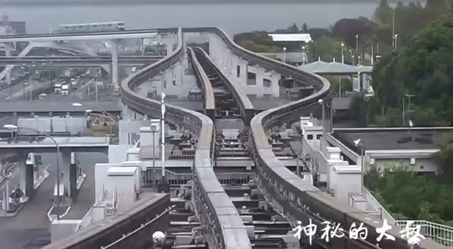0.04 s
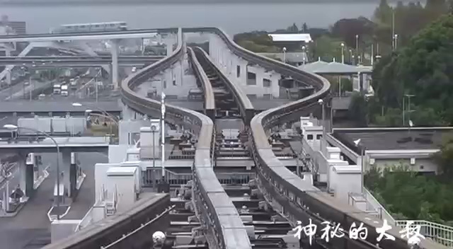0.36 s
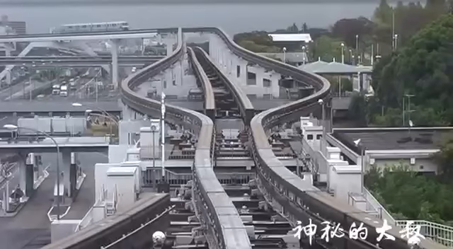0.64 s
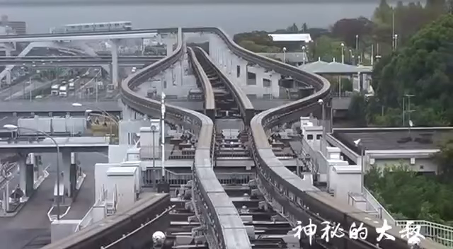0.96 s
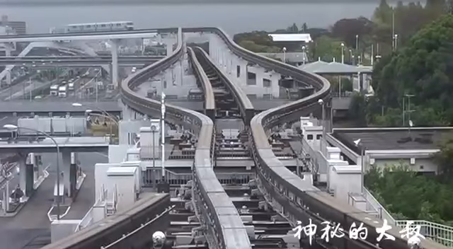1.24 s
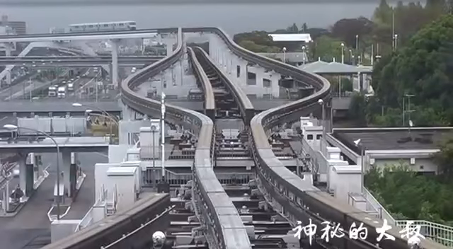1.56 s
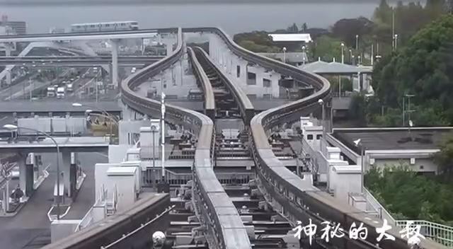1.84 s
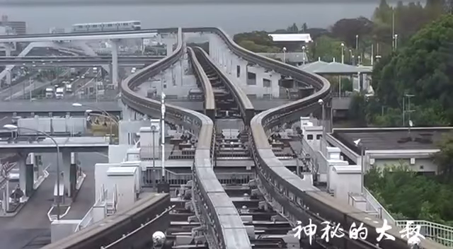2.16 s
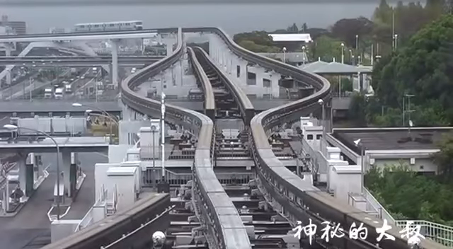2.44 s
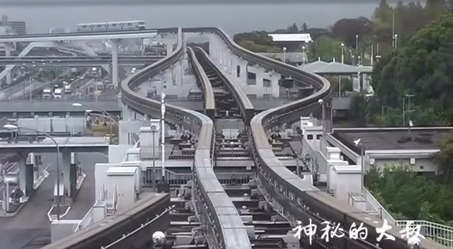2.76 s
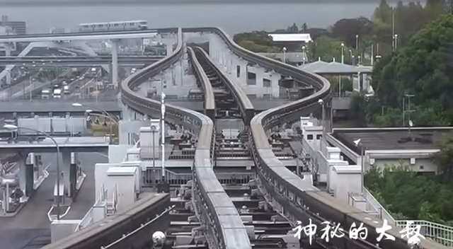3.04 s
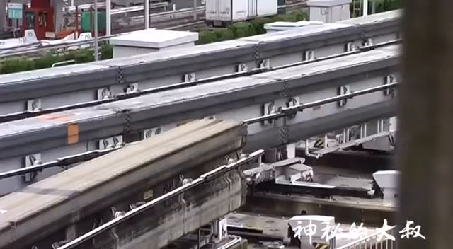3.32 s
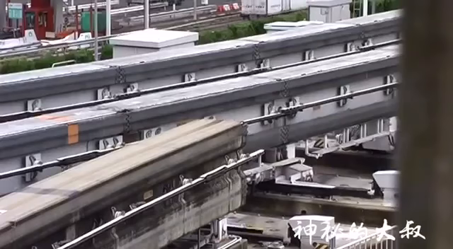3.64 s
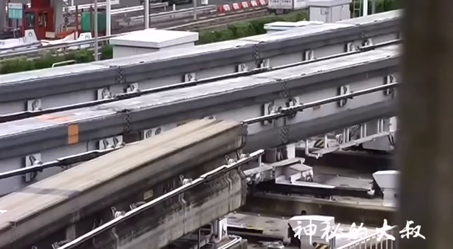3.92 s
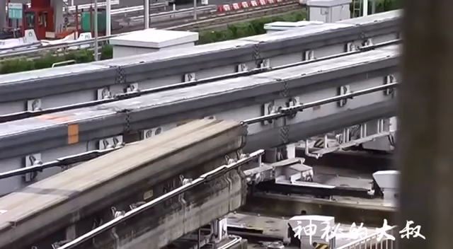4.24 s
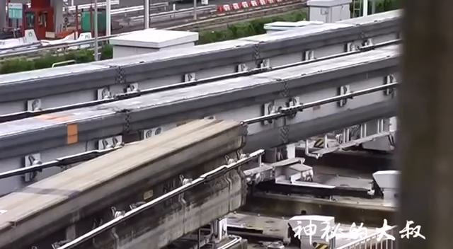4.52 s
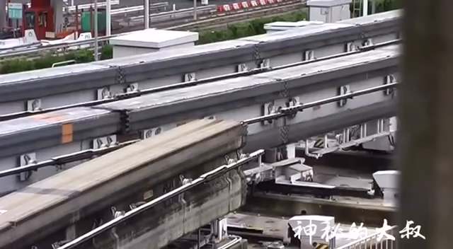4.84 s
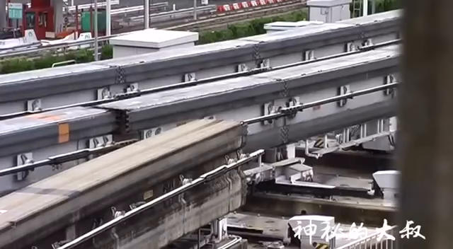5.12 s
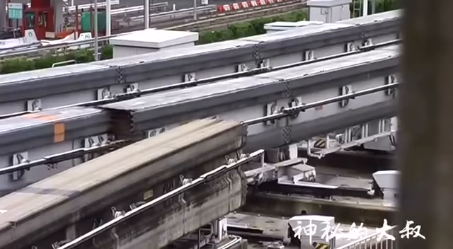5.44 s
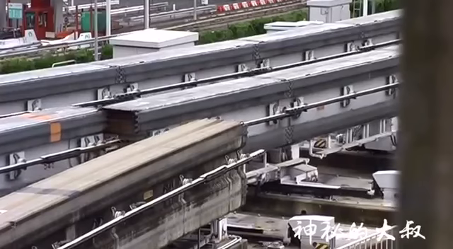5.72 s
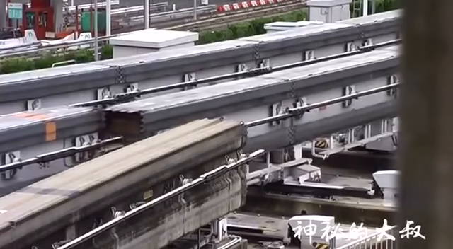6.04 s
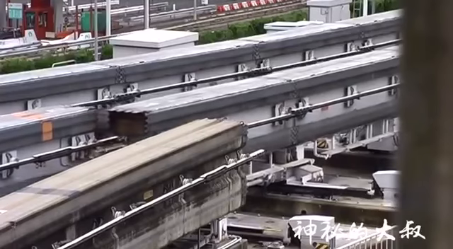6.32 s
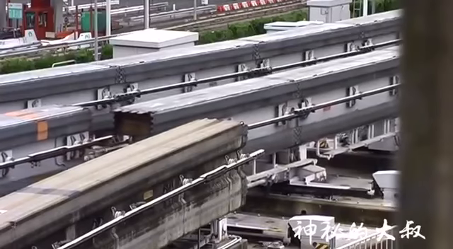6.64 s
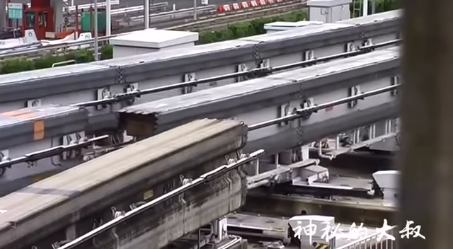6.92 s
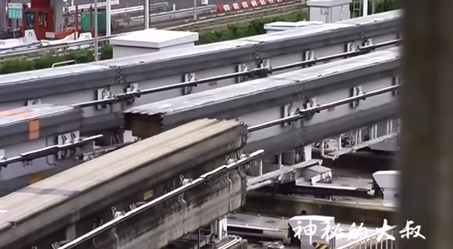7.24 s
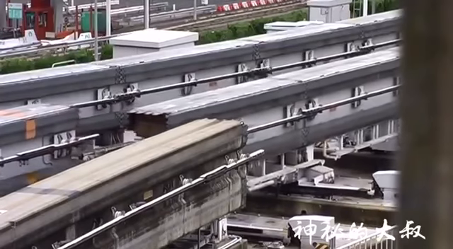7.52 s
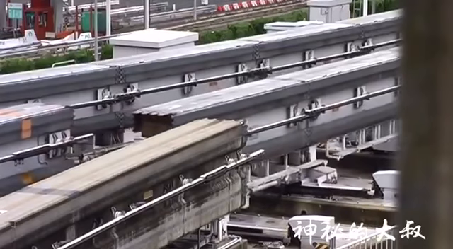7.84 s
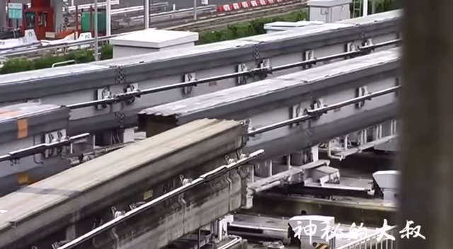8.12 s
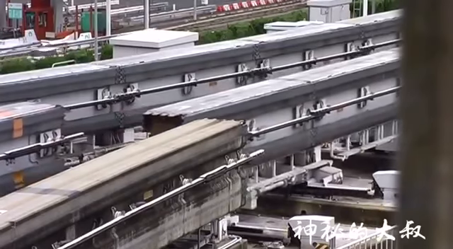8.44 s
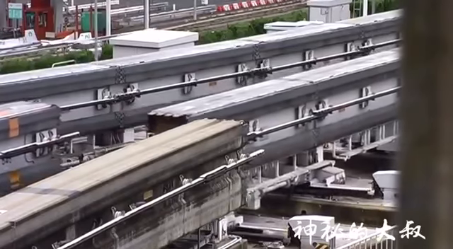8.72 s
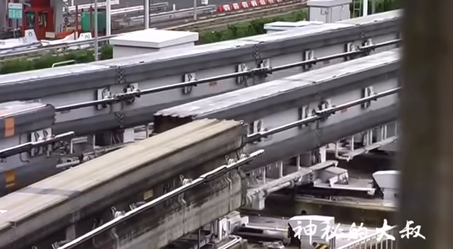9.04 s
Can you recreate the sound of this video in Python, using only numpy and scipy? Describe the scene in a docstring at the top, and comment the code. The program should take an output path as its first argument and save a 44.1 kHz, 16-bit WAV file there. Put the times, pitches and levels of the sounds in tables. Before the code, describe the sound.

A machine drones over city traffic, then a motor shifts a heavy track beam with metallic clanks, scrapes and dull knocks outdoors.

```python
"""Monorail track switch, outdoors

One mono microphone, two positions in turn. At the first, a machine drones over the wash of city traffic.
At the second, beside the switch, a motor slides a heavy hollow beam across: its steel joint scrapes
and clanks, the beam knocks and groans, and the blows echo in the yard. Far vehicles swell and fade."""
import sys
import numpy as np
from scipy import signal
from scipy.fft import rfft, irfft, next_fast_len
from scipy.io import wavfile
from scipy.ndimage import uniform_filter1d, map_coordinates

SR = 44100
rng = np.random.default_rng(int(sys.argv[2]) if len(sys.argv) > 2 else 0)


def file_out(sig):
    """Save sig as 16-bit WAV at sys.argv[1]."""
    # one column per channel
    cols = np.atleast_2d(sig).T
    # limit, then scale
    lim = np.clip(cols, -1, 1)
    pcm = np.round(lim * 32767).astype(np.int16)
    wavfile.write(sys.argv[1], SR, pcm)


N = 399987

START_S, CUT_S = 0.085, 3.115  # the first position opens, then cuts to the second
TOP_HZ = 9900
GEAR_HZ, MOTOR_HUM_HZ = 260.8, 118.4
GROAN_HZ, GROAN_DB = 317, -36.5
GROAN_FROM_S, GROAN_TO_S, GROAN_FADE_S = 3.4, 6.33, 0.63
RUMBLE_DB, TYRE_DB, HISS_DB, CITY_DB = -29, -31.5, -43, -28  # steady beds of far traffic

# Beside the switch, steel hitting steel:
# (time [s], level [dB], favoured pitch [Hz], focus [dB/octave], ring length [share of t60])
JOINT_HITS = [(3.679, -30, 5660, 50, .35), (3.757, -29, 5150, 31, 0.63), (3.845, -31, 3600, 10, 0.23),
              (4.219, -21, 2500, 13, .2), (4.270, -33, 3000, 10, .3), (4.415, -33, 5000, 14, .3),
              (4.711, -26, 5800, 13, 0.24), (4.7365, -11.5, 2000, 14, 0.08), (4.757, -29, 3030, 37, 0.5),
              (5.160, -27, 3800, 12, .4), (5.190, -25, 3500, 7, 0.38), (5.205, -26.5, 3456, 60, 0.84),
              (5.384, -24.5, 3700, 7, 0.4), (5.398, -27.5, 3456, 60, 0.5), (5.607, -18.5, 4400, 32, 0.35),
              (5.630, -31, 5500, 12, 0.36), (5.686, -23.5, 3000, 6, 0.3)]
# modes of the steel joint: (frequency [Hz], level [dB], t60 [s])
JOINT_MODES = [(1868, -2, .3), (2116, -3, .3), (2650, -7, .3), (3105, -1, .45), (3273, -4, .3),
               (3456, -2, 1.0), (3800, -4, .25), (4410, -3, .2), (5080, -2, .22), (5750, -4, .2),
               (6170, 0, .3), (7020, -2, .35), (8193, -5, .6), (8720, -8, .3)]
# sliding strokes of the joint: (time [s], level [dB], rise [s], t60 [s], squeal [share of power])
JOINT_STROKES = [(3.70, -35.5, 0.068, 0.55, 0.14), (4.21, -27, 0.061, 0.89, 0.01),
                 (4.441, -36, .03, 0.44, 0.1), (4.54, -35, .02, .35, .05), (4.66, -36, 0.066, 0.98, 0.56),
                 (4.98, -32, 0.07, .7, 0.26), (5.15, -27.5, 0.041, 0.86, 0),
                 (5.375, -31.5, .04, 0.85, 0.03), (5.60, -28.5, 0.016, 0.64, 0.06),
                 (5.81, -37.5, 0.077, .7, 1), (6.11, -40.5, .04, .55, 1), (8.29, -37, 0.022, 0.34, .2)]
# steel grinding and steel squealing: (frequency [Hz], relative level [dB])
GRIND_SPECTRUM = [(300, -15), (1000, 2), (1900, 0.5), (3000, -2), (4000, -5.5), (6000, -10.5), (7500, -17),
                  (9400, -17.5), (10000, -32)]
SQUEAL_SPECTRUM = [(1500, -31), (2850, -11), (3100, 5), (3450, -13), (5000, -13), (6050, -3.5), (7000, -13),
                   (8300, -14), (10000, -27)]
# knocks of the hollow beam: (time [s], level [dB], pitch [Hz], t60 [s])
BEAM_KNOCKS = [(4.7352, -19, 307, 0.23), (4.754, -18.5, 640, 0.074), (5.745, -20, 341, 0.27),
               (7.475, -16.5, 492, 0.15)]
# the gear note as the load on the motor changes: (time [s], level [dB])
GEAR_LEVEL = [(3.1, -51), (5.6, -42.5), (6.3, -37.5), (7.0, -35), (7.18, -31), (7.7, -30), (7.9, -37),
              (9.05, -39)]
# decay of the yard around the microphone: (frequency [Hz], t60 [s])
YARD_DECAY = [(200, 0.89), (2000, 0.22), (10000, 0.18)]
# vehicles passing far from the switch:
# (time when nearest [s], engine [dB], tyre roar [dB], tyre hiss [dB], half-width [s])
VEHICLES = [(4.4, -32.5, -33, -50, 0.2), (5.62, -38, -26, -39.5, 0.48), (7.22, -24.5, -26, -40, 0.53),
            (8.4, -41, -26, -42.5, 0.15), (8.92, -25.5, -28, -39.5, 0.31)]
# road rumble, engines, tyre roar and tyre hiss at a distance: (frequency [Hz], relative level [dB])
RUMBLE_SPECTRUM = [(25, -39.5), (55, -23), (90, -15.5), (120, -10), (165, -10), (220, -3.5), (290, -1),
                   (420, -4), (560, -1.5), (750, -4.5), (1200, -18.5), (3000, -59.5)]
ENGINE_SPECTRUM = [(50, -33), (120, -12), (180, -13), (260, -3.5), (380, 0.5), (520, 0.5), (700, -4.5),
                   (1200, -17), (3000, -59)]
TYRE_ROAR_SPECTRUM = [(200, -30), (500, -15.5), (780, -1.5), (1100, -0.5), (1500, -6), (2000, -10.5),
                      (2800, -17.5), (5000, -32.5), (10000, -57)]
TYRE_HISS_SPECTRUM = [(600, -34), (1600, -0.5), (2600, 1), (4000, -2), (5700, -6), (7000, -11), (8500, -14),
                      (9500, -19.5), (10000, -43)]

# First position, the machine's tones: (pitch [Hz], level [dB], level wander [dB], pitch wander [Hz])
MACHINE_TONES = [(118.7, -44, 1, 1), (158.2, -24, 1.5, 0.13), (520.3, -33.5, -0.6, 0.45)]
# far engines standing out of the wash: (time when nearest [s], level [dB], pitch [Hz], half-width [s])
FAR_ENGINES = [(0.56, -31, 294, 0.07), (0.95, -33.5, 442.6, 0.42), (1.72, -33, 295.6, 0.12),
               (2.13, -26.5, 282, 0.065), (2.62, -33.5, 275, 0.1)]
# roar and hiss of the city: (frequency [Hz], relative level [dB])
CITY_ROAR_SPECTRUM = [(25, -28), (50, -27), (80, -7.5), (120, -2.5), (220, -3), (400, 0), (900, -1),
                      (1500, -7.5), (2500, -17), (5000, -32.5), (10000, -67.5)]
CITY_HISS_SPECTRUM = [(500, -35), (1500, 2), (2600, 1.5), (4200, -1), (6400, -3), (8000, -9.5),
                      (9500, -16.5), (10000, -52)]
# slow swell of the city's hiss: (time [s], level [dB])
CITY_HISS_LEVEL = [(0.1, -38.5), (0.65, -35), (3.1, -36)]


def clanks():
    """Each contact cracks and rings the steel joint; where it lands decides which modes speak."""
    out, t = np.zeros(N), np.arange(SR) / SR
    hz, mode_db, t60 = np.transpose(JOINT_MODES)[:, :, None]
    air = lambda f: 1 / (1 + (f / 8000) ** 6)  # distance to the microphone dulls the crack
    attack = 1 - np.exp(-t / 0.00031)
    for s, db, favoured_hz, focus_db, length in JOINT_HITS:
        favour = lambda f: amp(-focus_db * np.abs(np.log2((f + 1) / favoured_hz)))
        strength = amp(mode_db + 1.5 * rng.standard_normal(hz.shape)) * favour(hz)
        # rubbing parts blur the pitch, most of all for the short-lived modes
        blur = np.cumsum(rng.standard_normal((len(hz), SR)), axis=1) * 0.0076 / t60
        phase = 2 * np.pi * (hz * t + rng.random(hz.shape)) + blur
        ring = np.sum(strength * np.sin(phase) * amp(-60 * t / (t60 * length)), axis=0)
        noise = unit(filtered(rng.standard_normal(SR), lambda f: favour(f) * air(f)))
        crack = noise * amp(-60 * t / 0.044)
        add(out, s, amp(db) * (amp(-7) * ring + amp(-6) * crack) * attack)
    return out


def scrapes():
    """The joint's fingers slide apart in showers of tiny slips that stir its modes; some strokes squeal."""
    out, t = np.zeros(N), np.arange(SR) / SR
    for s, db, rise, t60, share in JOINT_STROKES:
        slips = rng.standard_normal(SR) * (rng.random(SR) < 6000 / SR)  # about 6000 a second
        ring = unit(filtered(slips, joint_resonance))
        grind = unit(coloured(slips, GRIND_SPECTRUM) + 0.12 * ring)
        squeal = coloured(rng.standard_normal(SR), SQUEAL_SPECTRUM)
        rub = np.sqrt(1 - share) * grind + np.sqrt(share) * squeal
        stroke = np.minimum(t / rise, 1) ** 0.39 * amp(-60 * np.maximum(t - rise, 0) / t60)
        add(out, s, amp(db) * stroke * rub)
    return out


def joint_resonance(f):
    """Response of the steel joint, damped while its parts rub."""
    return sum(amp(db) / (1 + 1j * (f - hz) * t60 / 8) for hz, db, t60 in JOINT_MODES)


def knocks():
    """The hollow beam answers with a short, dull cluster of close modes."""
    out, t = np.zeros(N), np.arange(SR) / SR
    attack = 1 - np.exp(-t / 0.0012)
    for s, db, hz, t60 in BEAM_KNOCKS:
        cluster = noise_band(SR, hz, half_width_hz=90)
        body = 1.13 * np.sin(2 * np.pi * hz * t) + 0.51 * cluster
        add(out, s, amp(db) * body * amp(-60 * t / t60) * attack)
    return out


def motor():
    """The motor drives the beam; its gear note, the octave above and its hum grow with the load."""
    gear_db = curve(GEAR_LEVEL)
    note = tone(GEAR_HZ, wander_db=2.5, wander_hz=5)
    octave = amp(-6.5) * tone(2 * GEAR_HZ, wander_db=3, wander_hz=16)
    hum = amp(-35 + 0.35 * gear_db) * tone(MOTOR_HUM_HZ, wander_db=1.5, wander_hz=5.01)
    return amp(gear_db) * (note + octave) + hum


def groan():
    """The hollow beam groans in one narrow band while its joint slides apart."""
    t = np.arange(N) / SR
    sliding = np.clip(np.minimum(t - GROAN_FROM_S, GROAN_TO_S - t) / GROAN_FADE_S, 0, 1)
    return amp(GROAN_DB) * sliding * noise_band(N, GROAN_HZ, half_width_hz=22)


def yard(x):
    """Concrete beams and walls scatter the sound back to the microphone; the treble dies first."""
    hz, t, spectra = signal.stft(rng.standard_normal(SR), SR, nperseg=256)
    decay = amp(-60 * t / along(YARD_DECAY, hz)[:, None])
    tail = signal.istft(spectra * decay, SR, nperseg=256)[1]
    return signal.fftconvolve(x, tail / np.linalg.norm(tail))[:N]


def machine():
    """Heard from the first position, a machine drones on three slightly unsteady tones."""
    return sum(amp(db) * tone(hz, wander_db, wander_hz) for hz, db, wander_db, wander_hz in MACHINE_TONES)


def traffic():
    """Far behind the switch, each vehicle adds engine noise, tyre roar and hiss to a steady bed."""
    power = lambda column: sum(passing(row[0], row[column], row[-1]) ** 2 for row in VEHICLES)
    engine_power, roar_power, hiss_power = map(power, (1, 2, 3))
    rumble = amp(RUMBLE_DB) * rush(RUMBLE_SPECTRUM, patchy_db=1.27)
    engines = np.sqrt(engine_power) * rush(ENGINE_SPECTRUM, patchy_db=2.0)
    tyres = np.sqrt(amp(TYRE_DB) ** 2 + roar_power) * rush(TYRE_ROAR_SPECTRUM, patchy_db=1.5)
    hiss = np.sqrt(amp(HISS_DB) ** 2 + hiss_power) * rush(TYRE_HISS_SPECTRUM, patchy_db=1.86)
    return rumble + engines + tyres + hiss


def city():
    """From the first position, far vehicles merge into a wash; single engines stand out for a moment."""
    wall = lambda hz: 1 + 0.13 * np.exp(-2j * np.pi * hz * 0.00682)  # a near wall ripples the spectrum
    stream = passing(s=1.55, db=-26, half_width=0.9)  # a stream of vehicles goes by
    roar = np.hypot(amp(CITY_DB), stream) * filtered(rush(CITY_ROAR_SPECTRUM, patchy_db=1.55), wall)
    hiss = amp(curve(CITY_HISS_LEVEL)) * rush(CITY_HISS_SPECTRUM, patchy_db=1.25)
    engines = sum(passing(s, db, half_width) * tone(hz, wander_db=1.5, wander_hz=0.0198 * hz)
                  for s, db, hz, half_width in FAR_ENGINES)
    return roar + hiss + engines


def passing(s, db, half_width):
    """A vehicle's gain, 1 / distance: nearest the microphone at s, 3 dB down half_width seconds away."""
    return amp(db) / np.hypot(1, (np.arange(N) / SR - s) / half_width)


def amp(db):
    """Decibels to gain."""
    return 10 ** (np.asarray(db) / 20)


def unit(x):
    """Scale to rms 1."""
    return x / np.sqrt(np.mean(x ** 2) + 1e-20)


def along(points, hz):
    """Interpolate (frequency [Hz], value) points on a log frequency axis."""
    f, values = np.transpose(points)
    return np.interp(np.log(hz + 1), np.log(f + 1), values)


def curve(points):
    """Interpolate (time [s], value) points to one value per sample."""
    return np.interp(np.arange(N) / SR, *np.transpose(points))


def wobble(rate):
    """A smooth random curve, rate knots a second."""
    knots = rng.standard_normal(int(N * rate / SR) + 4)
    return map_coordinates(knots, [np.arange(N) * rate / SR])


def filtered(x, response):
    """Pass x through a frequency response."""
    size = next_fast_len(len(x) + 8192)
    return irfft(rfft(x, size) * response(np.fft.rfftfreq(size, 1 / SR)), size)[:len(x)]


def coloured(x, spectrum):
    """x shaped by a spectrum, at rms 1."""
    return unit(filtered(x, lambda hz: amp(along(spectrum, hz))))


def noise_band(samples, hz, half_width_hz):
    """Noise of rms 1 gathered around one pitch."""
    return unit(filtered(rng.standard_normal(samples), lambda f: 1 / (1 + ((f - hz) / half_width_hz) ** 2)))


def rush(spectrum, patchy_db):
    """Coloured noise of rms 1 with drifting patches of gain."""
    spectra = signal.stft(rng.standard_normal(N), nperseg=1024)[2]
    patches = uniform_filter1d(rng.standard_normal(spectra.shape), size=7, axis=0)  # across frequency
    patches = uniform_filter1d(patches, size=10, axis=1)  # across time
    noise = signal.istft(spectra * amp(patchy_db * unit(patches)), nperseg=1024)[1][:N]
    return coloured(noise, spectrum)


def tone(hz, wander_db, wander_hz):
    """A sine of rms 1, unsteady in pitch and level."""
    phase = 2 * np.pi * np.cumsum(hz + wander_hz * wobble(12)) / SR
    return unit(np.sin(phase) * amp(wander_db * wobble(5)))


def add(track, s, sound):
    """Mix a sound into the track from time s."""
    part = track[round(s * SR):][:len(sound)]
    part += sound[:len(part)]


def scene():
    """The microphone stands at an overlook, then the scene cuts to the side of the switch."""
    t = np.arange(N) / SR
    blows = clanks() + knocks()
    switch = blows + amp(-9.5) * yard(blows) + scrapes() + motor() + groan() + traffic()
    overlook = (t > START_S) * (city() + machine())
    moved = np.clip((t - CUT_S) / 0.006 + 0.5, 0, 1)  # 6 ms crossfade
    return ((1 - moved) * overlook + moved * switch)[None]


def record(dry):
    """The recorder keeps nothing above its band limit."""
    band_limit = lambda hz: np.clip((TOP_HZ - hz) / 200 + 0.5, 0, 1)
    return np.array([filtered(x, band_limit) for x in dry])


dry = scene()
out = record(dry)
file_out(out)
```